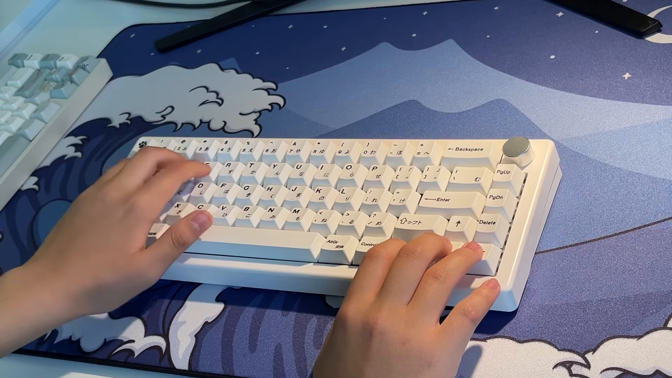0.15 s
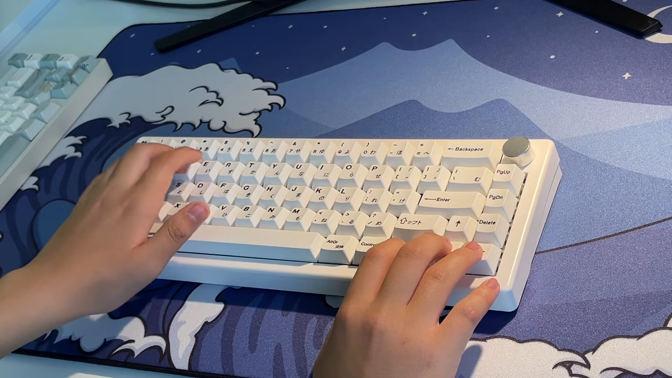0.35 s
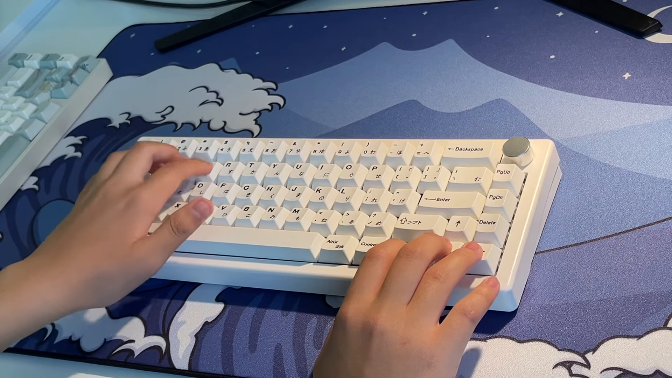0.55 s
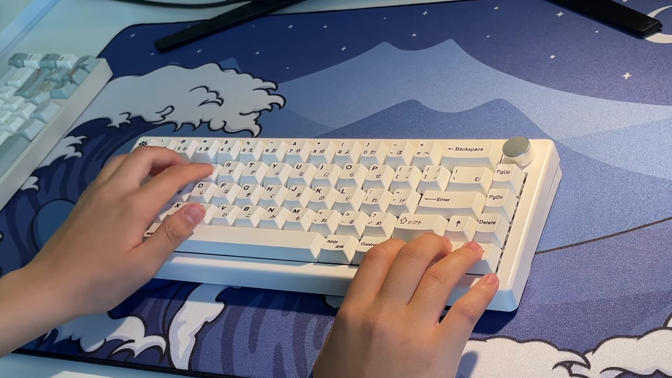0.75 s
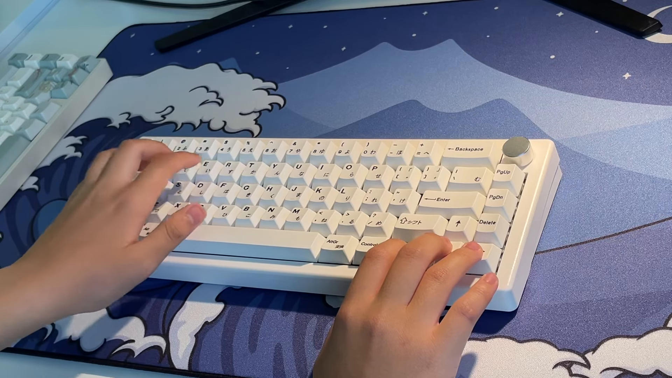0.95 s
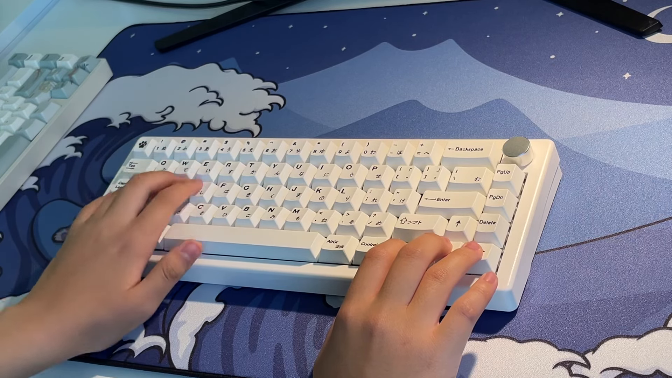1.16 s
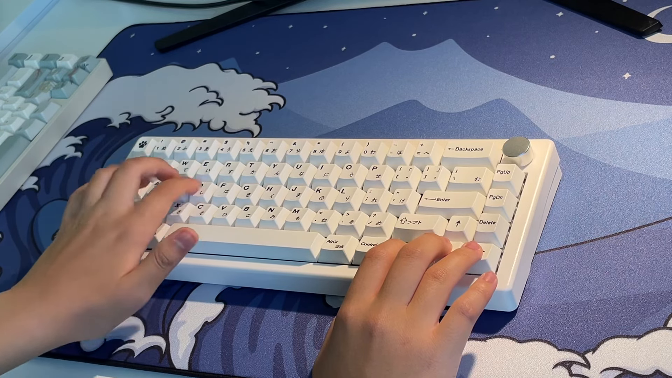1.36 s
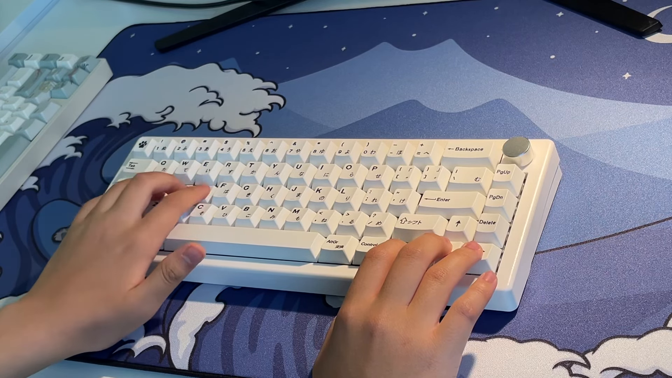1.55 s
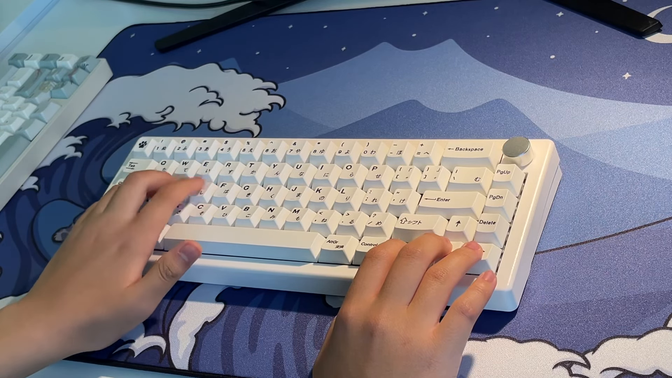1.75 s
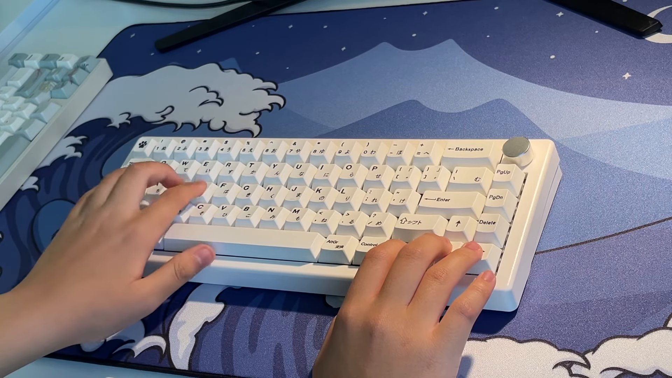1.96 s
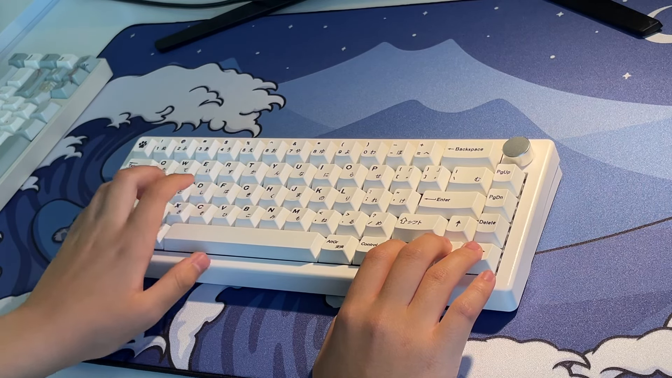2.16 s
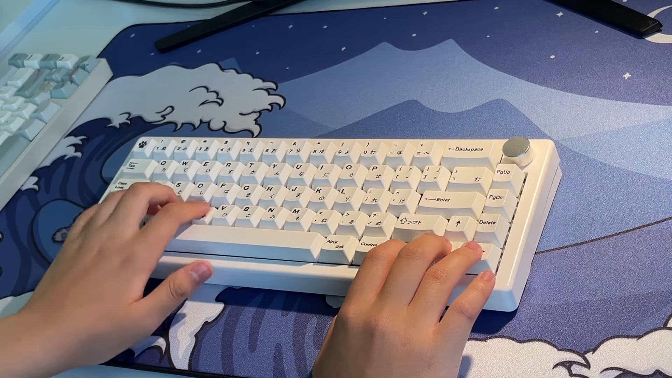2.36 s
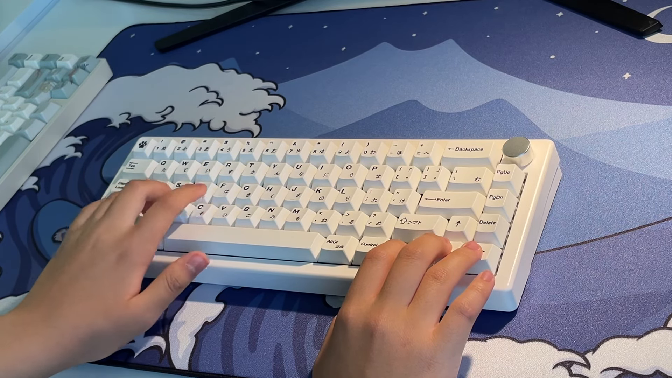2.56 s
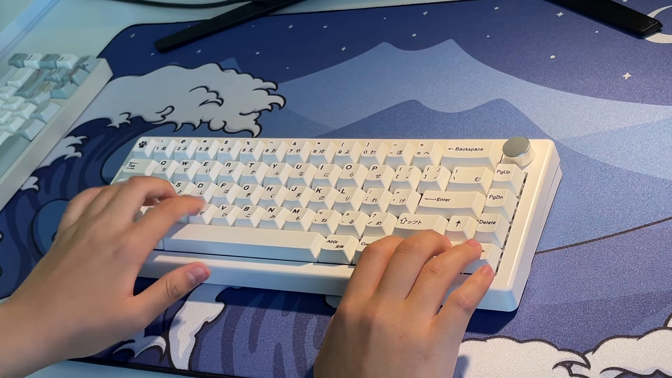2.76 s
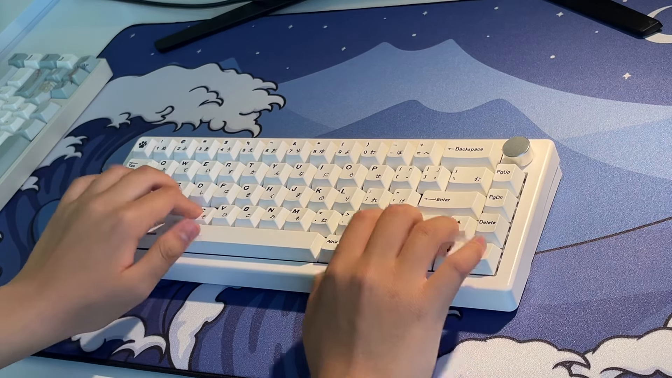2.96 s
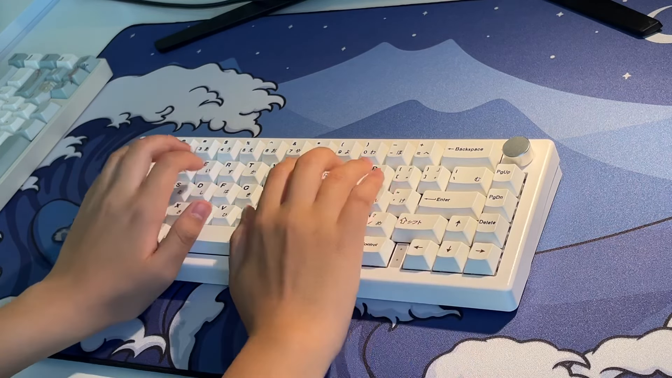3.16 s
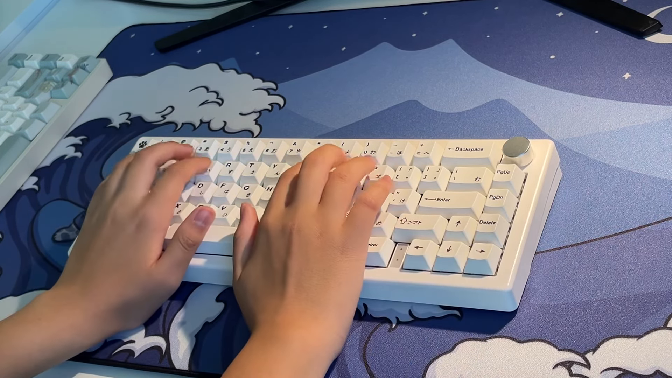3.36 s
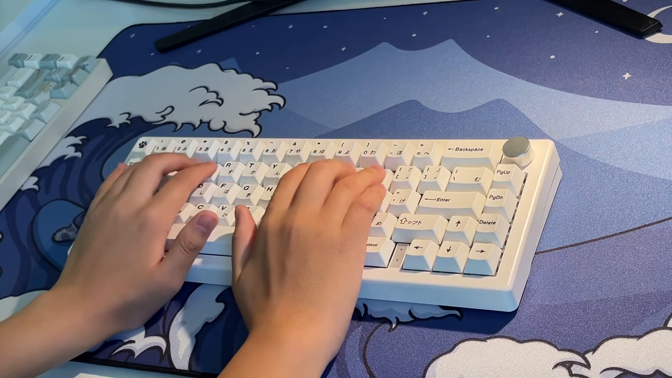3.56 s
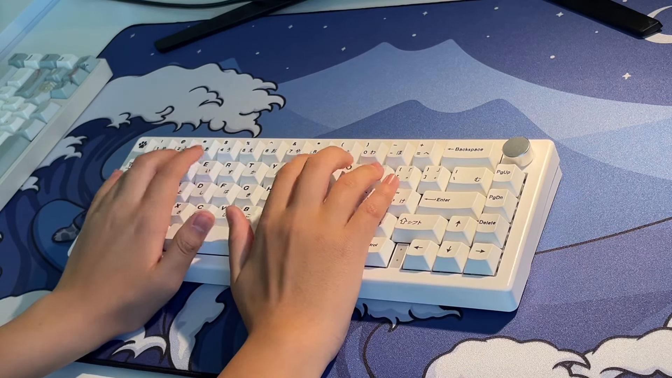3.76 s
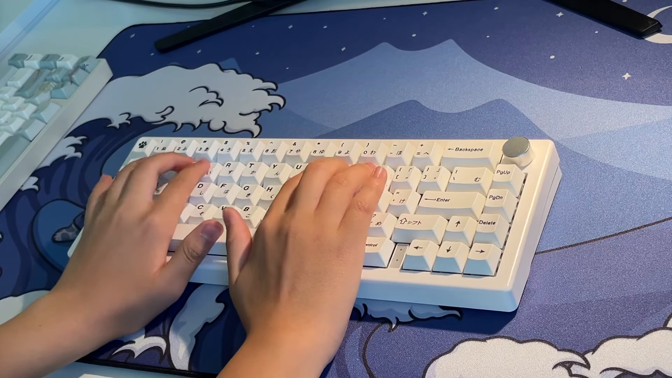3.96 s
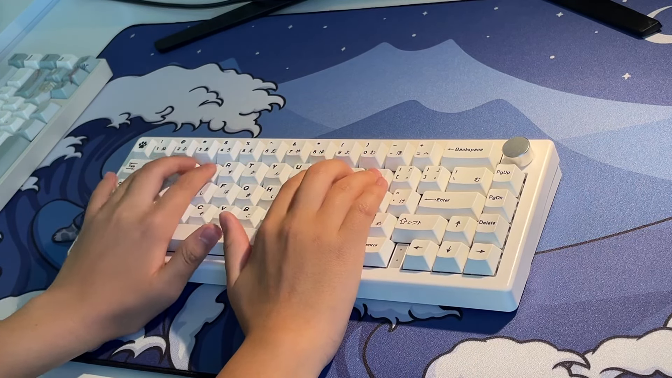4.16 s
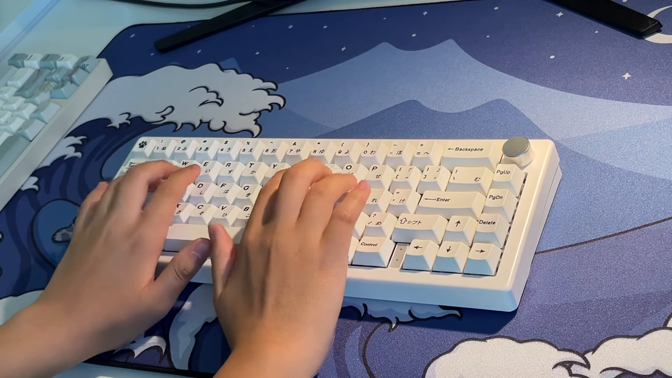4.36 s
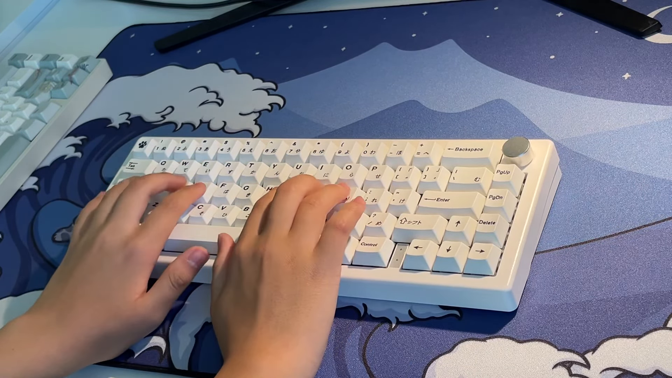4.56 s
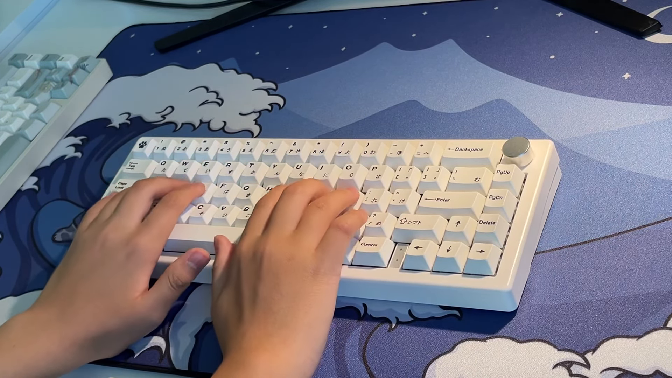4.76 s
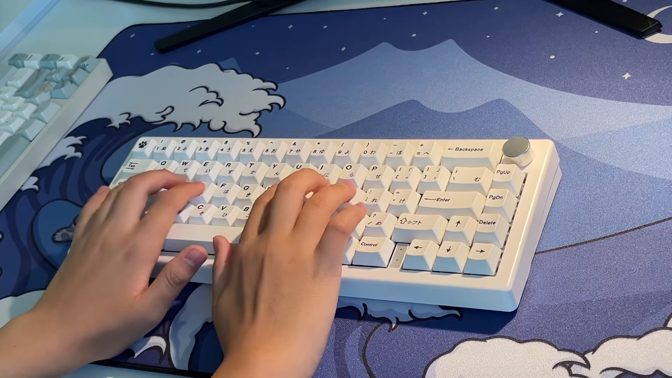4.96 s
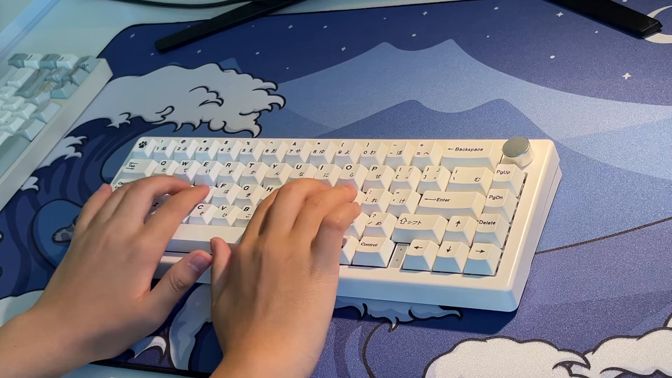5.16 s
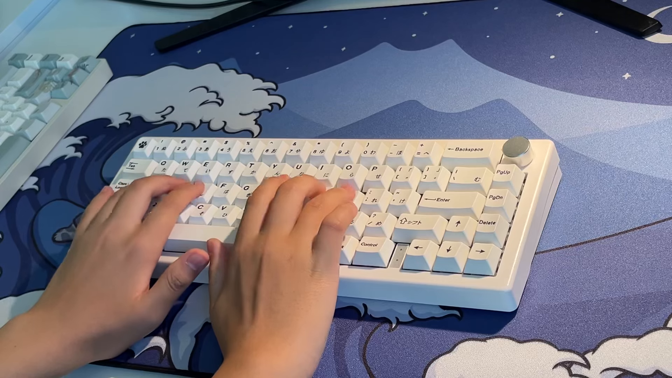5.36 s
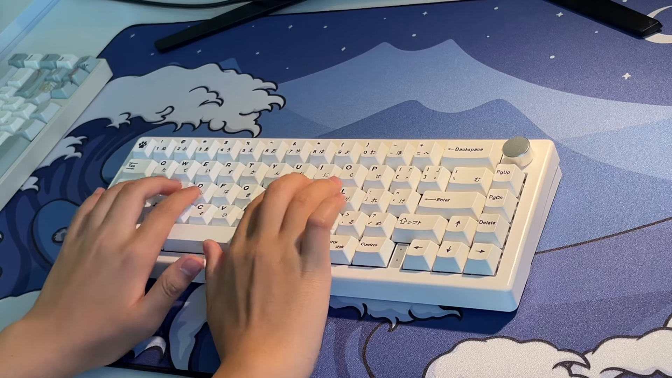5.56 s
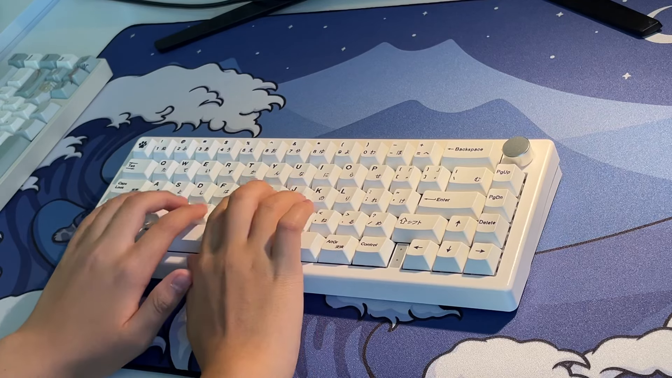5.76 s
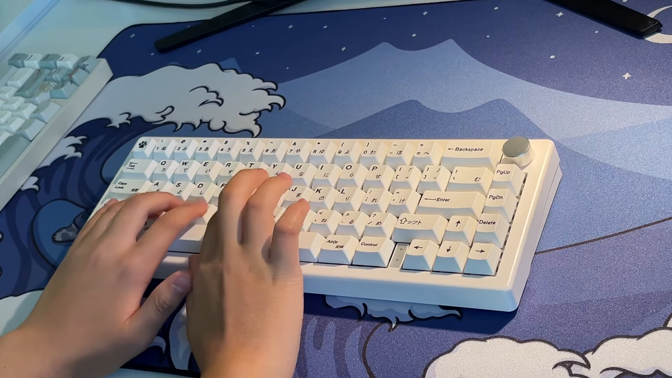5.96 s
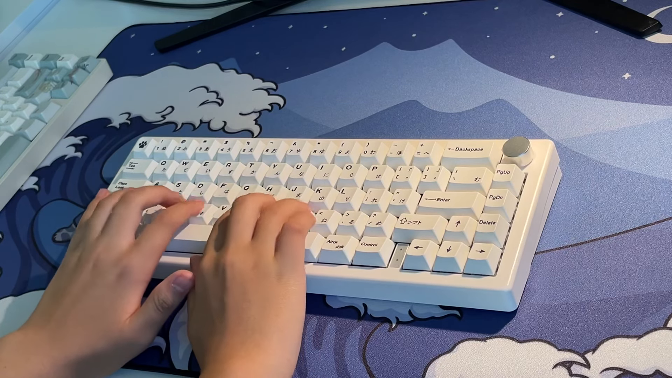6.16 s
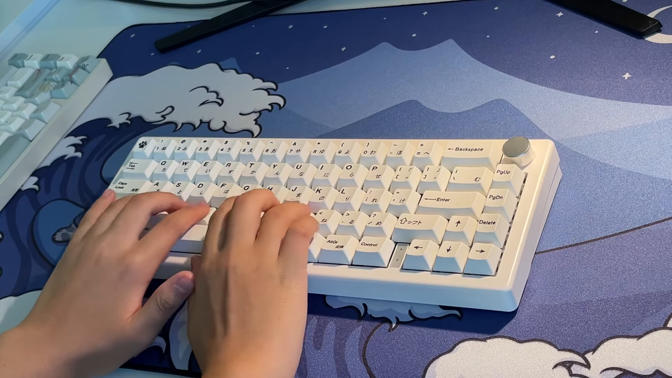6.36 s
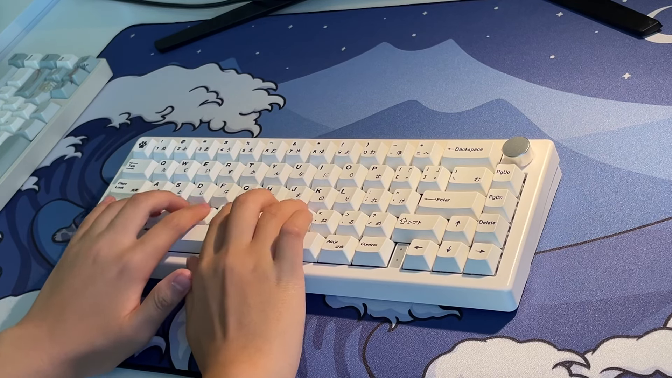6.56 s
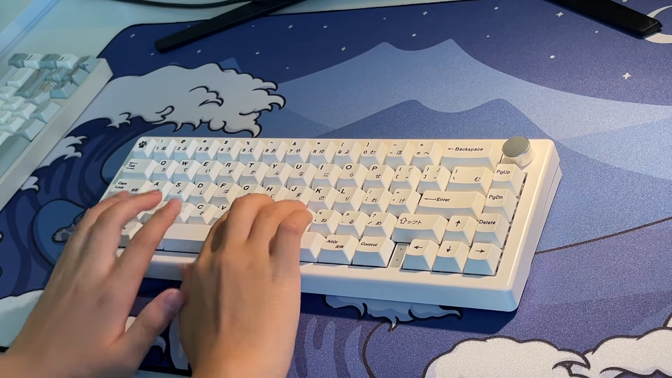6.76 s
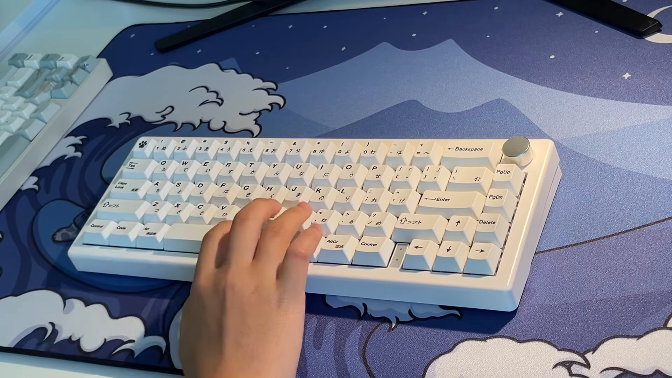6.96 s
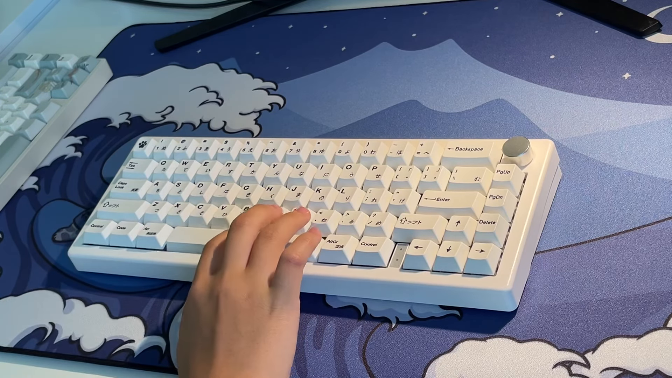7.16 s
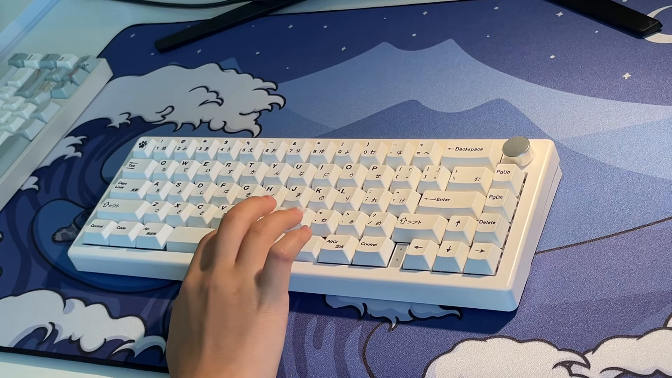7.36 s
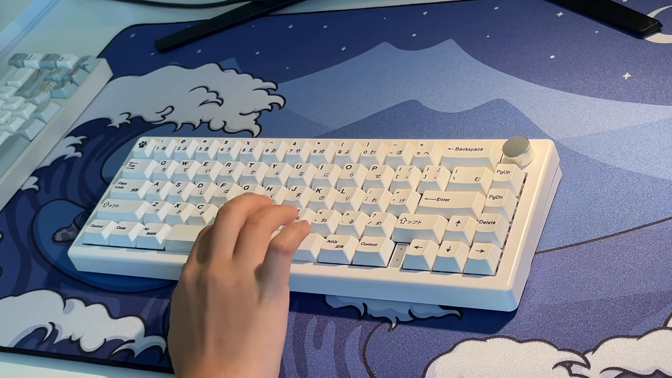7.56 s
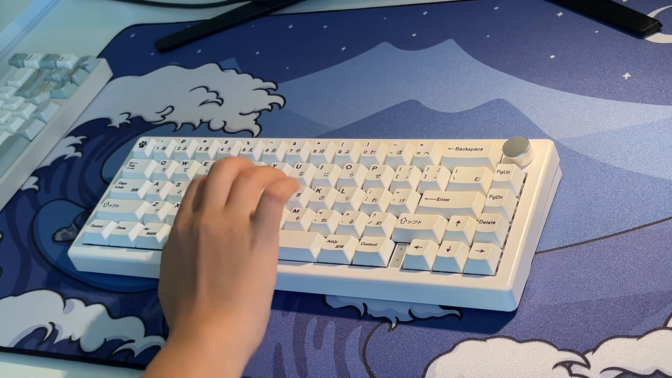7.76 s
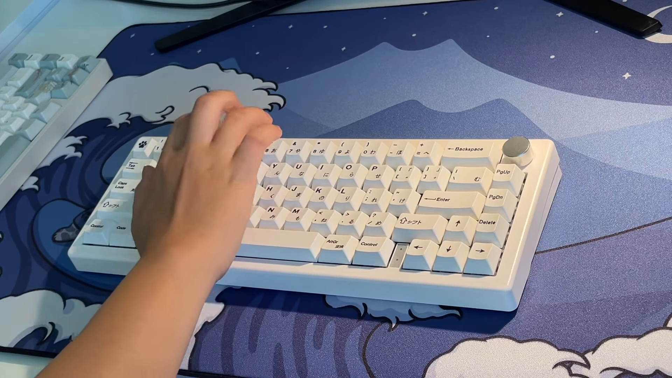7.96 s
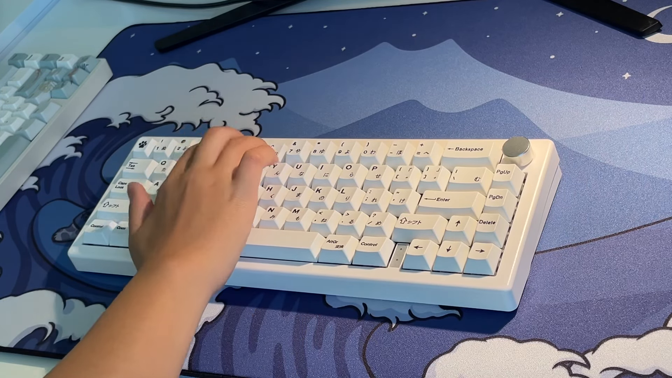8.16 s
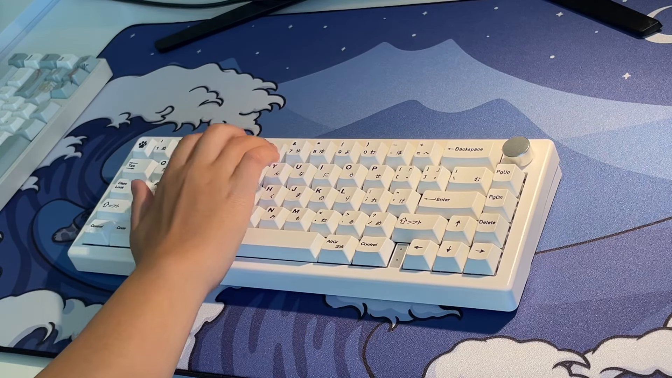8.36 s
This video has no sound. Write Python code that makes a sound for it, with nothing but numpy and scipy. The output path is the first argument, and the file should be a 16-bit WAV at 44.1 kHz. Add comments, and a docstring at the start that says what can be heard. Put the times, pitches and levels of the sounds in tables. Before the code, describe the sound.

Close damped key clicks patter rapidly in uneven bursts on a desk mat, ending with three hollow, booming bar taps and brief final keystrokes.

```python
"""Bursts of keyboard typing

A damped mechanical keyboard on a desk mat, heard close up in a quiet, faintly hissing room.
Every press and release pops a keycap, rings the switch plate and ticks the stem, all as short filtered blows.
The fingers' weight thumps the desk's low modes, and fingertips brush the caps as runs of tiny grains.
Near the end the space bar is tapped three times, clacking and booming. A small room answers with noise tails."""
import sys
import numpy as np
from scipy import signal
from scipy.fft import rfft, irfft, next_fast_len
from scipy.io import wavfile

SR = 44100
rng = np.random.default_rng(int(sys.argv[2]) if len(sys.argv) > 2 else 0)


def transcribe(u):
    """Save the signal u as a 16-bit wav file named by the first command-line argument.

    u: samples, shape (n,) or (channels, n), limited to [-1, 1]; the rate is SR.
    q: integer samples, one column per channel.
    """
    v = np.clip(np.atleast_2d(u).T, -1, 1)
    q = np.round(v * 32767).astype(np.int16)
    wavfile.write(sys.argv[1], SR, q)


N = 370881

# keys hitting bottom or springing back: start_s [s], cap_db [dB], cap_hz [Hz], plate_db [dB]
KEY_CONTACTS = [(0.0998, -1.0, 2050.0, -12), (0.1414, -6.5, 2250.0, -5.0), (0.2064, 0.0, 2300.0, 1.0),
                (0.2142, -2, 2000.0, -4.5), (0.271, -8, 1900.0, 0), (0.3127, -2.5, 2150.0, 0),
                (0.4062, 6, 1950.0, -12), (0.4828, -4, 2300.0, -1.5), (0.5368, -8, 1450.0, -13),
                (0.587, 1, 1850.0, 4.5), (0.691, 7.5, 2000.0, -8.5), (0.7192, -6, 2400.0, -2),
                (0.7808, 0.5, 2200.0, -0.5), (0.8006, -5.5, 1700.0, -8), (0.8663, -7.5, 1950.0, -2),
                (0.8996, -6.5, 2200.0, -0.5), (1.1697, -9, 2000.0, -20), (1.1963, 0.5, 1700.0, -2.5),
                (1.2385, -4, 2650.0, -4), (1.2902, -2, 1700.0, -8.5), (1.311, -17, 1750.0, -2.5),
                (1.3711, -6, 2200.0, -1.5), (1.4457, 4.5, 1900.0, -7), (1.5103, -9.5, 1650.0, -8.5),
                (1.5431, -0.5, 2500.0, -1.5), (1.5985, -3.5, 1850.0, -7), (1.647, -0.5, 1950.0, -6.5),
                (1.661, -5.5, 2150.0, -1.5), (1.7428, 2, 1900.0, -6), (1.809, 4.5, 2300.0, 4.5),
                (1.8575, -3, 1300.0, -12.5), (1.8799, -8, 1800.0, -4.5), (1.9654, -5, 2250.0, -2.5),
                (2.24, 1, 1600.0, -5.5), (2.2985, -10, 1300.0, -14), (2.3544, -8.5, 2250.0, -2.0),
                (2.384, -1, 1350.0, -6.5), (2.3931, -12, 1300.0, -5), (2.482, -9.5, 2050.0, -2),
                (2.5675, 0, 1400.0, -16), (2.6023, -1, 1300.0, -4), (2.6248, 0, 2000.0, 4),
                (2.676, -5.5, 1650.0, -4), (2.7075, -10.5, 1300.0, -1), (2.754, -6.5, 1550.0, 3.5),
                (2.8757, 2.5, 2250.0, 9), (2.9191, -4.5, 1600.0, -0.5), (2.9728, -16, 2000.0, -3.5),
                (3.0184, -9.5, 2100.0, -2.5), (3.4833, 2.5, 1700.0, -7.5), (3.4959, -1.5, 1700.0, -1.5),
                (3.4994, 1, 1950.0, 2.5), (3.5341, -4, 1850.0, -3.5), (3.5442, 1.5, 2250.0, 3.5),
                (3.6085, -6, 1550.0, -6.5), (3.6323, -8, 2000.0, -6.5), (3.6684, -3, 2250.0, 2.5),
                (3.6981, -3.5, 1300.0, -8), (3.7243, -1.5, 2650.0, -13), (3.7996, 0, 1750.0, -5),
                (3.8364, 0, 1950.0, 1.5), (3.8445, 2.5, 1700.0, -5), (3.8841, 0.5, 2050.0, -9.5),
                (3.9407, -6, 1300.0, -3.5), (3.9686, -1.5, 1450.0, -17), (3.9772, -2.5, 1600.0, -5.5),
                (3.9903, -5.5, 1750.0, 3), (3.998, -0.5, 1800.0, -3), (4.084, -5.5, 1450.0, -10),
                (4.0945, 4.5, 1850.0, -11.5), (4.1192, -1.5, 1350.0, -1), (4.1349, 3.5, 1700.0, -1.5),
                (4.1426, -2.5, 1950.0, -16), (4.1564, 0, 2350.0, 1), (4.2104, -6.5, 1550.0, -4.5),
                (4.2555, -7.5, 1600.0, 1.5), (4.2877, -1.5, 1900.0, -2), (4.704, 3.5, 1950.0, -6.0),
                (4.7476, -0.5, 1750.0, -6), (4.7952, 0.5, 2350.0, 1), (4.846, -1.5, 1500.0, -16),
                (4.8619, -2.5, 1700.0, -1.5), (4.8956, -4.0, 1700.0, -7), (4.9433, -6, 1300.0, -2.5),
                (4.9523, -7.5, 2350.0, -3.5), (5.0129, 2, 1650.0, -10.5), (5.0676, -0.5, 1900.0, -9.5),
                (5.0789, -3.5, 1750.0, -2), (5.1241, 2.5, 2150.0, -3.5), (5.1406, -1.5, 2400.0, 1.5),
                (5.1804, -3, 1750.0, -3.5), (5.2363, -1, 1800.0, 0.5), (5.25, -6, 2200.0, -9),
                (5.2602, -2, 2100.0, -7.5), (5.3486, 3, 1750.0, -2), (5.3658, -3.5, 2050.0, -1.5),
                (5.3932, 0, 2500.0, -7), (5.398, -0.5, 1900.0, -2.5), (5.4604, -6.5, 1750.0, -5),
                (5.5107, -5.5, 1800.0, 2), (5.5314, -3.5, 2000.0, -8.5), (5.5593, -3.5, 2050.0, -7.5),
                (5.9818, -1, 1300.0, -4.5), (6.0307, -5.5, 2300.0, 1), (6.0692, -1.5, 1300.0, -2),
                (6.1046, -3.5, 1850.0, -6.0), (6.133, -10, 1800.0, -2.5), (6.1497, -6.0, 1850.0, 6),
                (6.1703, 0, 2150.0, 0.0), (6.1941, -7, 1300.0, -3.5), (6.2569, -0.5, 1300.0, -7.5),
                (6.2713, -1, 1800.0, 2), (6.3019, -4, 2000.0, 0), (6.3249, 0, 2000.0, 4.5),
                (6.369, 1, 1300.0, 1.5), (6.4127, 2.0, 1900.0, 2.5), (6.441, -9, 2250.0, 3.5),
                (6.47, -0.5, 2150.0, 1), (6.5014, -9, 1300.0, 0.0), (6.5197, -1, 1400.0, -13),
                (6.5463, 0, 2000.0, 3), (6.556, -3.0, 2100.0, 3), (6.628, 0, 1300.0, 3),
                (6.6509, 3.5, 1400.0, 2.5), (6.6869, -6, 2200.0, -1), (6.7455, -17, 1300.0, -3.5),
                (6.797, -8.5, 1850.0, -4), (8.0605, 0, 1700.0, -3), (8.0999, -4.5, 2200.0, -6),
                (8.2077, -10, 1300.0, -4.5), (8.2417, -7.5, 1650.0, -4.5), (8.2898, -7.5, 1950.0, -4),
                (8.3808, 0, 1950.0, 0)]
# space bar going down and up: start_s [s], level_db [dB], brightness_hz [Hz]
BAR_CONTACTS = [(7.174, -5.5, 12040), (7.2499, -5.5, 5600), (7.3525, -4.5, 12050), (7.41, -5, 3300),
                (7.495, 1.5, 12000), (7.584, -4, 6040)]
# fingertips landing and brushing on the keycaps: start_s [s], relative level_db [dB]
SCUFFS = [(0.083, -15.5), (1.1, -27.5), (2.23, -20.5), (2.832, -17.5), (2.862, -15), (3.218, -19.5),
          (3.24, -19.5), (3.284, -23.5), (3.305, -18.5), (3.467, -30), (3.773, -13), (4.225, -11),
          (4.435, -24), (4.52, -18.5), (4.548, -22.5), (4.671, -31), (5.953, -13), (6.78, -19.5),
          (7.148, -23.5), (8.034, -21.5), (8.18, -16.5), (8.37, -10.5)]
# weight of the fingers on the desk, before the force of each stroke: time_s [s], relative level_db [dB]
FINGER_WEIGHT = [(0.101, -47), (0.8, -48.5), (1.5, -49), (2.3, -48.5), (2.9, -49), (3.7, -46.5),
                 (4.3, -48.5), (5.2, -44), (5.5, -47.5), (6.201, -46.5), (6.7, -45.5), (8.2, -42.5)]

# tone colour of the keycap: freq_hz [Hz], level_db [dB]
CAP_COLOUR = [(300, -16.5), (600, -10), (1300, -2), (2100, 2), (2500, 3.5), (3400, -9.5), (6500, -20),
              (9000, -37)]
# tone colour of the stem: freq_hz [Hz], level_db [dB]
STEM_COLOUR = [(500, -23.5), (3000, 10), (4300, 0), (6300, -5), (7800, -10), (10000, -10.5), (12300, -20),
               (14200, -19), (16000, -25)]
# tone colour of the space bar: freq_hz [Hz], level_db [dB]
BAR_COLOUR = [(450, -13.5), (740, 2.5), (1150, -5), (2000, 0.5), (2900, -3), (3400, -7), (4500, -17.5),
              (6300, -7), (7800, -17.5), (10000, -24), (15000, -28)]
# boom of the case under the space bar: freq_hz [Hz], level_db [dB]
CASE_COLOUR = [(30, -32), (60, 5.5), (84, -4.5), (125, 3.5), (175, -18.5), (265, -12), (370, -18),
               (520, -35.5), (1000, -61)]
# low modes of the desk: freq_hz [Hz], width_hz [Hz], level_db [dB]
DESK_MODES = [(62.1, 5.7, 3.5), (77, 10, 1.5), (118.9, 9.6, -3), (206.6, 6.6, -15), (254.4, 32, -23.5),
              (330, 77, -27.5)]

# the plate's pitch under the striking finger, higher toward the far rows: time_s [s], pitch_hz [Hz]
PLATE_PITCH = [(0.3, 986), (2.0, 953), (2.4, 860), (3.1, 870), (3.45, 1004), (5.5, 940), (6.0, 870),
               (8.3, 865)]
# level of the stem's tick, drifting slowly over the typing, before the blow's own strength:
# time_s [s], level_db [dB]
TICK_LEVEL = [(0.5, -20), (2.0, -21), (2.9, -18.5), (3.8, -19.5), (5.3, -19.5), (6.5, -19), (8.3, -18)]

# decay time of the room: freq_hz [Hz], t60_s [s]
ROOM_T60 = [(200, 0.44), (2600, 0.3873), (10000, 0.32)]
# tone colour of the room: freq_hz [Hz], level_db [dB]
ROOM_COLOUR = [(300, 15.5), (900, -5.5), (2000, -5), (2600, -0.5), (3400, -1), (5500, 1.5), (7800, -8),
               (10500, -0.5), (15000, -10)]
# tone colour of the quiet air: freq_hz [Hz], level_db [dB]
AIR_COLOUR = [(20, -24), (60, -4), (450, -30), (2500, -45.5), (6500, -43), (8000, -47), (10500, -47.5),
              (15000, -62)]
# how much diffuse sound differs between the two close microphones: freq_hz [Hz], side_db [dB]
DIFFUSE_SIDE = [(50, -19), (150, -6), (1000, -1), (2500, -4), (4500, -18.5), (8000, -13.5), (12000, -12)]
# the two microphone ports resonate differently: freq_hz [Hz], left_lead_rad [radians]
PORT_PHASE = [(100, 0), (600, 0.15), (1400, 0.41), (3000, 0.22), (4700, -0.1), (5500, -1.5), (6200, -1.17),
              (7000, -3.0), (8000, -3), (8900, -2.9), (9700, -1.5), (11000, -0.6), (12000, 1.9),
              (14300, 0.5), (16000, 3.6)]
# and in level: freq_hz [Hz], left_minus_right_db [dB]
PORT_BALANCE = [(110, 0), (200, 2.5), (380, 1), (700, -0.5), (2400, 1.6), (4400, 0)]

# A key springing back rings its cap more than the plate, and the plate answers lower:
# the cap's lead where this begins (dB), the further lead to complete it (dB), the full pitch drop (share)
REBOUND_DB, REBOUND_SPAN_DB, REBOUND_DROP = 2.5, 3, 0.18
# neighbouring keys meet the plate at slightly different pitches (share)
PLATE_SCATTER = 0.032
# the tick grows with the blow: dB per dB of keycap, dB per dB of plate, random scatter (dB)
TICK_PER_CAP, TICK_PER_PLATE, TICK_SCATTER_DB = 1.4, 0.27, 1.18
# loose cap settling after a contact and stem sliding before it, ahead of the blow's strength (dB)
SETTLE_DB, SLIDE_DB = -19.5, -22.5

TOP_HZ = 16500  # upper band limit
LENGTH = 8192  # samples in one struck sound
HZ = np.fft.rfftfreq(LENGTH, 1 / SR) + 1  # lifted by 1 Hz so that its log exists
T = np.arange(LENGTH) / SR


def keys():
    """Each contact sounds the keycap, the plate at that key's place and the stem; the loose cap then settles."""
    out = np.zeros(N)
    cap_colour = amp(along(CAP_COLOUR, HZ))
    stem_colour = amp(along(STEM_COLOUR, HZ)) * HZ / (HZ + 300)
    tick = impact(stem_colour, cycles=0.6905)
    for start_s, cap_db, cap_hz, plate_db in KEY_CONTACTS:
        rebound = np.clip((cap_db - plate_db - REBOUND_DB) / REBOUND_SPAN_DB, 0, 1)
        detune = 1 - REBOUND_DROP * rebound + PLATE_SCATTER * rng.standard_normal()
        plate_hz = np.interp(start_s, *np.transpose(PLATE_PITCH)) * detune

        cap = cap_colour * resonance(cap_hz, width_hz=1030)
        plate = resonance(plate_hz, width_hz=270) * resonance(plate_hz, width_hz=290)
        pop = impact(np.hypot(amp(cap_db) * cap, amp(plate_db) * plate), cycles=0.6933)
        # a square, hard hit pops cleanly; a glancing one buzzes more
        pop_buzz_db = -7.5 - 0.6 * max(cap_db, plate_db)
        add(out, start_s, buzzing(pop, buzz_db=pop_buzz_db, buzz_t60=0.029))

        tick_db = np.interp(start_s, *np.transpose(TICK_LEVEL))
        tick_db += TICK_PER_CAP * cap_db + TICK_PER_PLATE * plate_db
        tick_db += TICK_SCATTER_DB * rng.standard_normal()
        add(out, start_s, amp(tick_db) * buzzing(tick, buzz_db=0.5, buzz_t60=0.0089))

        light = impact(cap + amp(-24.5) * stem_colour, cycles=0.691)
        settle_db = SETTLE_DB + 0.5 * cap_db + 3 * rng.standard_normal()
        settle = amp(settle_db) * signal.fftconvolve(light, rub(t60=0.035))
        add(out, start_s + rng.uniform(0.007, 0.04), settle)
        # the stem slides in its housing just before it lands
        slide = amp(SLIDE_DB + 0.5 * cap_db) * signal.fftconvolve(light, rub(t60=0.08))
        add(out, start_s - rng.uniform(0.0047, 0.018), slide)
    return out


def space_bar():
    """The long bar clacks over a wider band, then booms downward in pitch through the case."""
    clack, boom = np.zeros((2, N))
    bar = amp(along(BAR_COLOUR, HZ)) * HZ / (HZ + 80)
    case = impact(amp(along(CASE_COLOUR, HZ)), cycles=3.4)
    for start_s, level_db, bright_hz in BAR_CONTACTS:
        # each contact has its own brightness; some are duller
        blow = impact(bar / (1 + (HZ / bright_hz) ** 2), cycles=0.698)
        add(clack, start_s, amp(level_db) * buzzing(blow, buzz_db=-6, buzz_t60=0.018))
        add(boom, start_s, amp(0.5 * level_db + 15) * buzzing(case, buzz_db=-3, buzz_t60=0.22))
    return clack, boom


def fingertips():
    """Skin and nails brush the caps without pressing them, and nudge the desk."""
    scuff, nudge = np.zeros((2, N))
    colour = amp(along(CAP_COLOUR, HZ)) * resonance(1200, width_hz=970)
    brush = impact(colour, cycles=0.626)
    first_touch = impact(colour, cycles=0.644)
    for start_s, level_db in SCUFFS:
        add(scuff, start_s, amp(level_db + 1.1) * signal.fftconvolve(brush, rub(t60=0.055)))
        add(scuff, start_s, amp(level_db - 3) * first_touch)
        add(nudge, start_s, amp(level_db + 20.0) * thump(scatter_db=4.0))
    return scuff, nudge


def desk():
    """Every key stroke pushes the desk through the mat; resting hands keep it faintly rumbling."""
    times, weight_db = np.transpose(FINGER_WEIGHT)
    out = np.zeros(N)
    for start_s, cap_db, _, plate_db in KEY_CONTACTS:
        force_db = np.interp(start_s, times, weight_db) + 0.63 * max(cap_db, plate_db)
        add(out, start_s, amp(force_db + 54.0) * thump(scatter_db=2.0))

    def body(f):
        """Broad peaks at the desk's modes."""
        return sum(amp(db) / (1 + ((f - hz) / width) ** 2) for hz, width, db in DESK_MODES)

    rumble = unit(filtered(rng.standard_normal(N), body))
    return out + amp(-62) * rumble


def thump(scatter_db):
    """A soft push rings the desk's modes, at new strengths each time."""
    power = 0
    for hz, width, db in DESK_MODES:
        strength = amp(db + scatter_db * rng.standard_normal())
        power = power + (strength * resonance(hz, width) * resonance(hz, hz)) ** 2
    return buzzing(impact(np.sqrt(power), cycles=2.2), buzz_db=1.0, buzz_t60=0.18)


def room(x, delay, early_db):
    """A few near surfaces, then a diffuse noise tail, drawn afresh five times a second."""
    out = np.zeros((2, N))
    block = SR // 5
    for start in range(0, N, block):
        hz, t, noise = signal.stft(rng.standard_normal((2, SR // 2)), SR, nperseg=256)
        decay = fade(t, along(ROOM_T60, hz)[:, None])
        tail = unit(signal.istft(noise * decay, SR, nperseg=256)[1])
        tail /= np.sqrt(tail.shape[1])  # energy 1 per channel on average
        lags, sizes = rng.uniform(0.0037, 0.02, size=5), rng.standard_normal(size=5)
        for lag, size in zip(lags, sizes):
            add(tail, lag, amp(early_db) * size * np.ones((2, 1)))
        reply = signal.fftconvolve(x[None, start:start + block], tail, axes=1)
        add(out, start / SR + delay, reply)
    return spread(*filtered(out, lambda f: amp(along(ROOM_COLOUR, f))))


def air():
    """The quiet room's own rumble and hiss, as coloured noise."""
    noise = filtered(rng.standard_normal((2, N)), lambda f: amp(along(AIR_COLOUR, f)))
    return amp(-65.5) * unit(spread(*noise))


def impact(gain, cycles):
    """A causal blow of this colour; bending waves bring the treble first, each frequency lagging some cycles."""
    # folding the cepstrum gives minimum phase
    cepstrum = irfft(np.log(gain + 1e-6))
    cepstrum[1:LENGTH // 2] *= 2
    cepstrum[LENGTH // 2 + 1:] = 0
    return irfft(np.exp(rfft(cepstrum) - 2j * np.pi * cycles * np.log(HZ)))


def buzzing(blow, buzz_db, buzz_t60):
    """The blow, trailed by the dense ringing of the parts around it."""
    buzz = rng.standard_normal(LENGTH) * fade(T, buzz_t60) * (1 - np.exp(-T / 0.001))
    trail = signal.fftconvolve(blow, buzz / np.linalg.norm(buzz))[:LENGTH]
    closing = np.cos(np.pi / 2 * (T / T[-1]) ** 2)  # brings the end to silence
    return (blow + amp(buzz_db) * trail) * closing


def rub(t60):
    """A short run of tiny stick-slip grains, about 900 a second, of energy 1."""
    grains = rng.standard_normal(LENGTH) * (rng.random(LENGTH) < 900 / SR) * fade(T, t60)
    return grains / (np.linalg.norm(grains) + 1e-9)


def resonance(hz, width_hz):
    """Gain of one damped mode."""
    return 1 / np.hypot(1, (HZ ** 2 - hz ** 2) / (HZ * width_hz))


def spread(mid, side):
    """Left and right of a diffuse sound."""
    side = filtered(side, lambda f: amp(along(DIFFUSE_SIDE, f)))
    return np.array([mid + side, mid - side])


def amp(db):
    """Decibels to gain."""
    return 10 ** (np.asarray(db) / 20)


def unit(x):
    """Scaled to rms 1."""
    return x / np.sqrt(np.mean(x ** 2) + 1e-20)


def along(points, hz):
    """(Hz, value) points read on a log axis."""
    f, v = np.transpose(points)
    return np.interp(np.log(hz + 1), np.log(f), v)


def fade(t, t60):
    """Exponential decay, down 60 dB after t60 seconds."""
    return 1000.0 ** (-t / t60)


def filtered(x, response):
    """x shaped by a response of frequency."""
    m = next_fast_len(N + SR // 2)
    return irfft(rfft(x, m) * response(np.fft.rfftfreq(m, 1 / SR)), m)[..., :N]


def add(track, s, sound):
    """Mix a sound into the track at time s."""
    start = max(round(s * SR), 0)
    part = track[..., start:start + sound.shape[-1]]
    part += sound[..., :part.shape[-1]]


def scene():
    """The keyboard sits straight ahead, the room around it; the desk's deepest notes hardly reach the walls."""
    clack, boom = space_bar()
    scuff, nudge = fingertips()
    typing = keys() + scuff
    low = desk() + boom + nudge
    radiated = filtered(low, lambda f: f ** 2 / (f ** 2 + 170 ** 2))
    to_room = amp(-6.5) * typing + amp(-6.5) * clack + amp(-20) * radiated
    echo = room(to_room, delay=0.006, early_db=-19.5)
    return typing + clack + low + echo + air()


def record(dry):
    """Each microphone port adds its own phase and level; nothing passes above the band limit."""
    half = np.array([[0.5], [-0.5]])  # left and right share each difference equally

    def ports(hz):
        """Left and right responses."""
        level = amp(half * along(PORT_BALANCE, hz))
        return level * np.exp(1j * half * along(PORT_PHASE, hz))

    return filtered(dry, lambda hz: ports(hz) * (hz < TOP_HZ))


dry = scene()
out = record(dry)
transcribe(out)
```